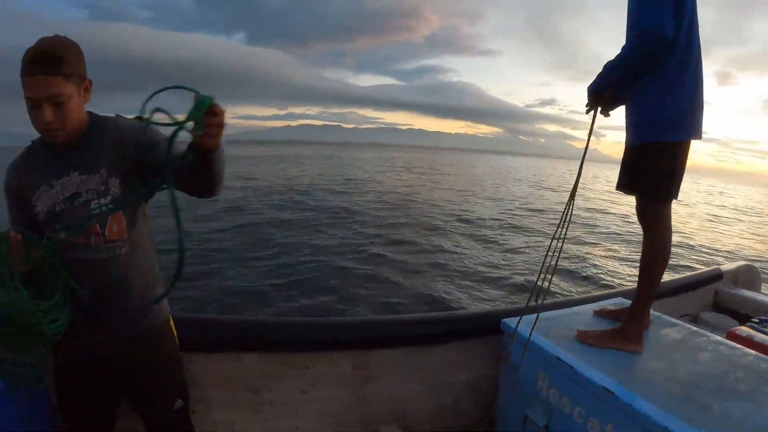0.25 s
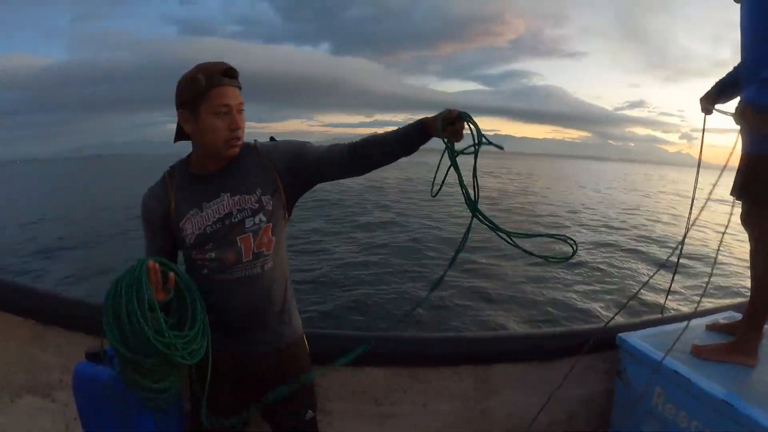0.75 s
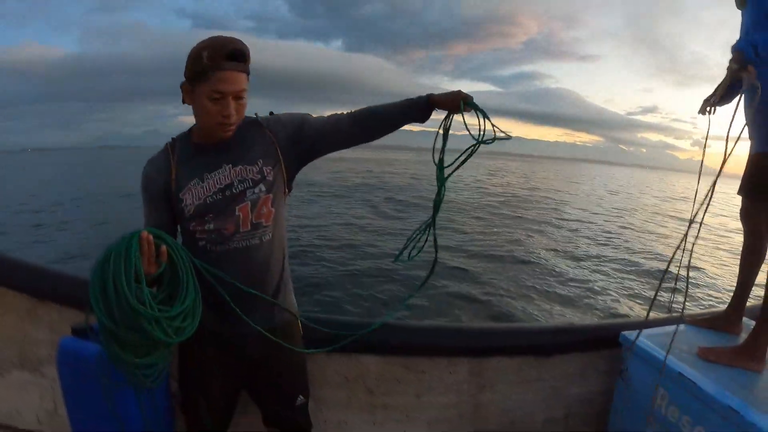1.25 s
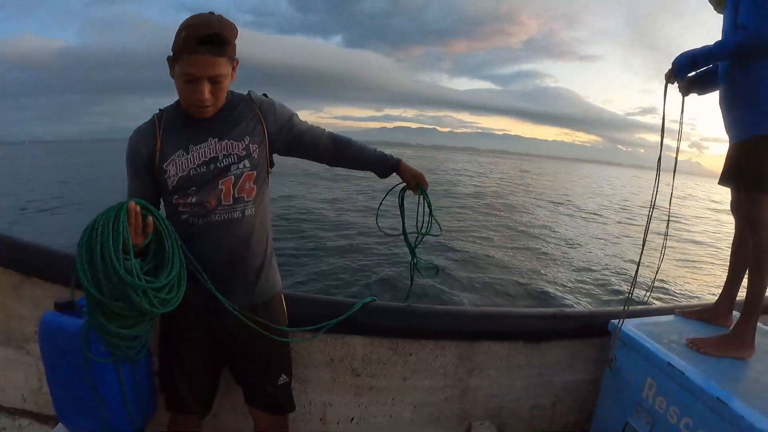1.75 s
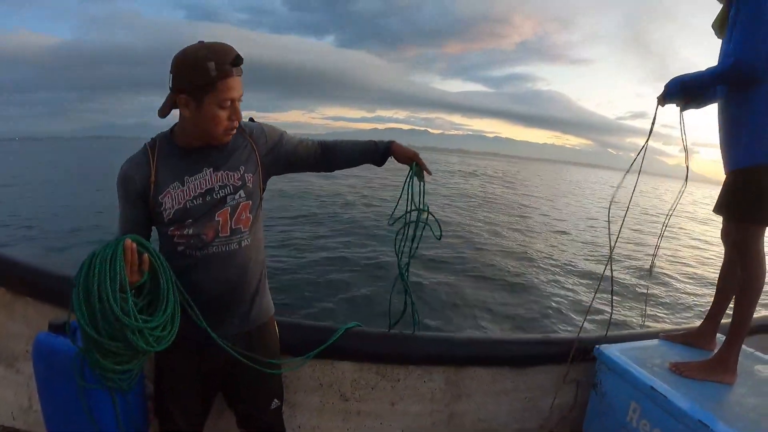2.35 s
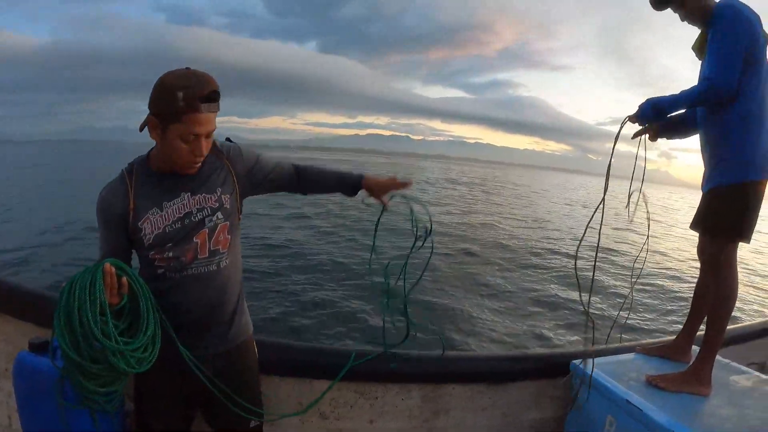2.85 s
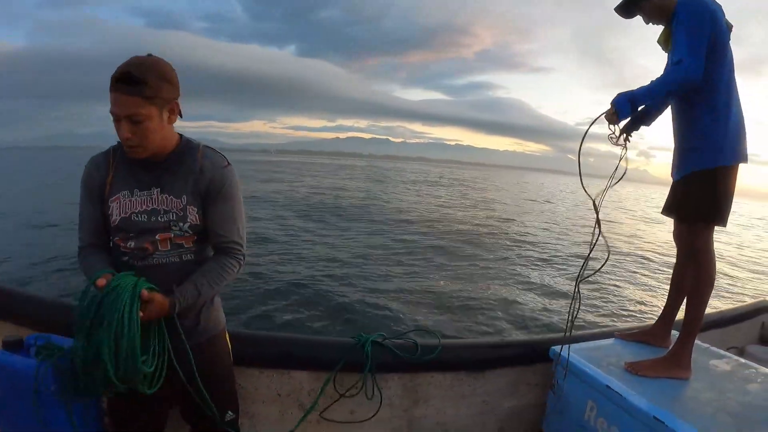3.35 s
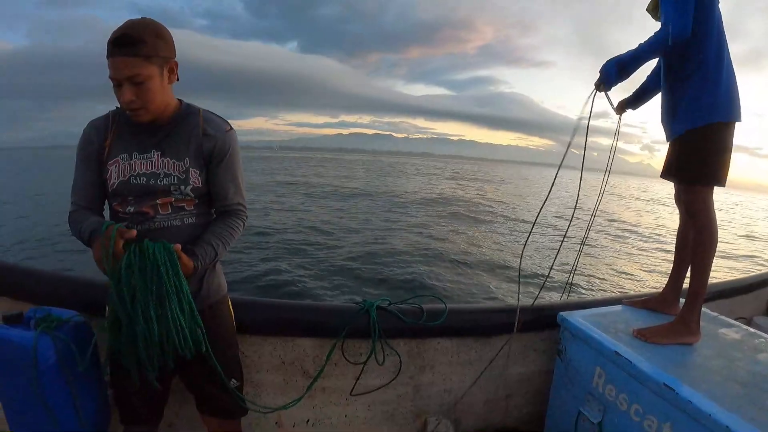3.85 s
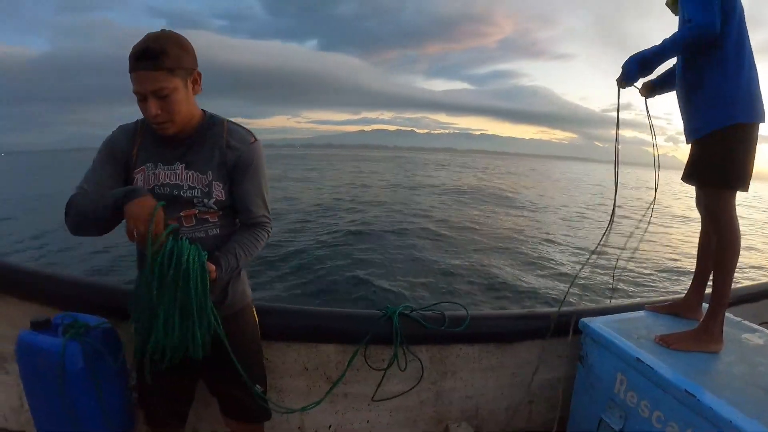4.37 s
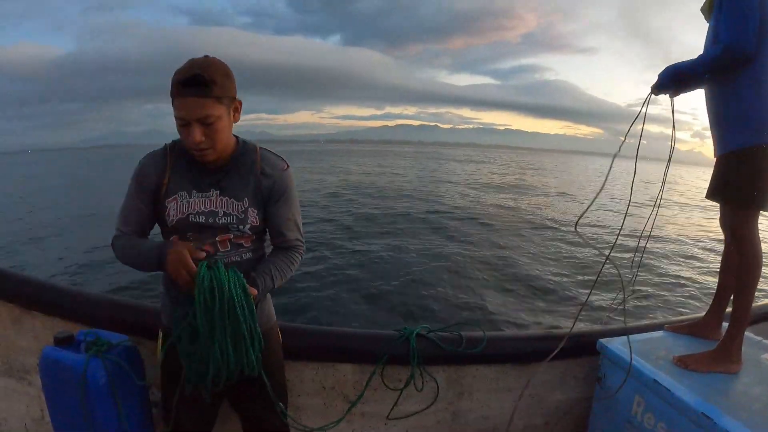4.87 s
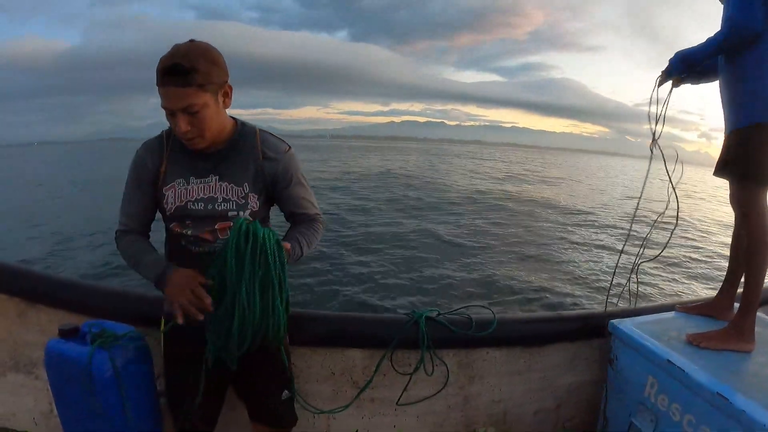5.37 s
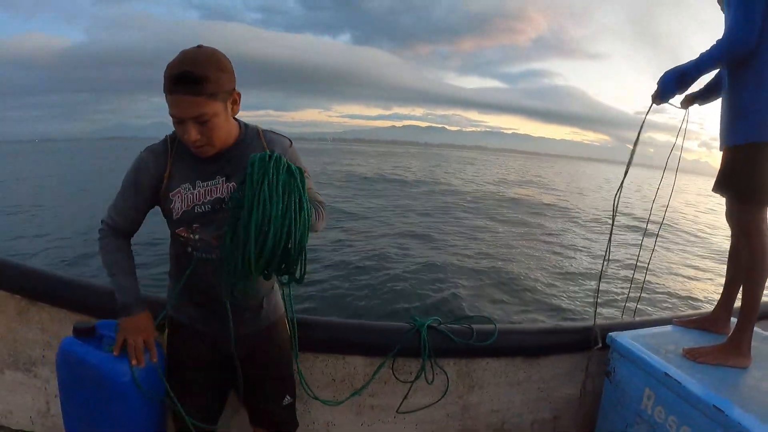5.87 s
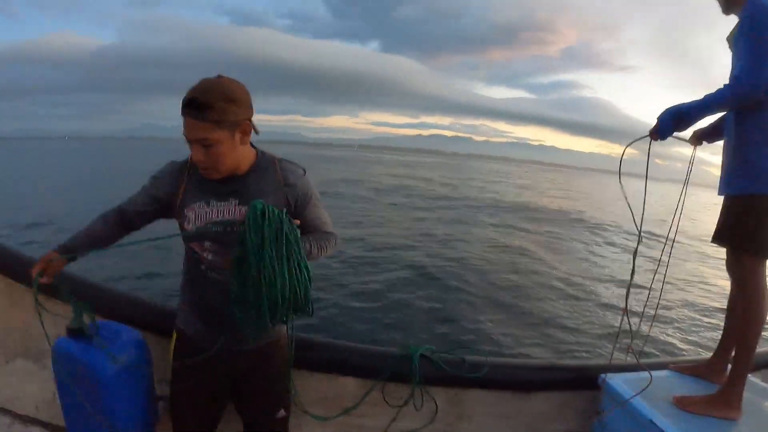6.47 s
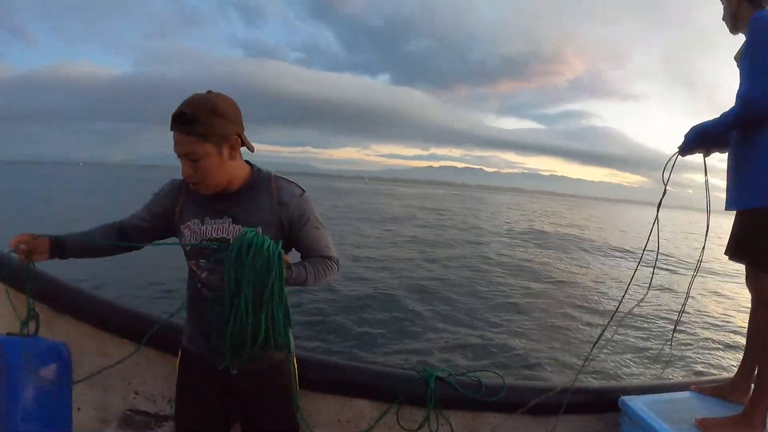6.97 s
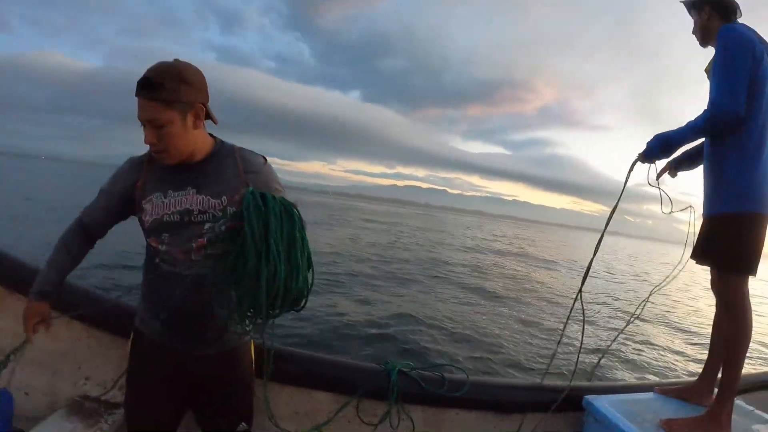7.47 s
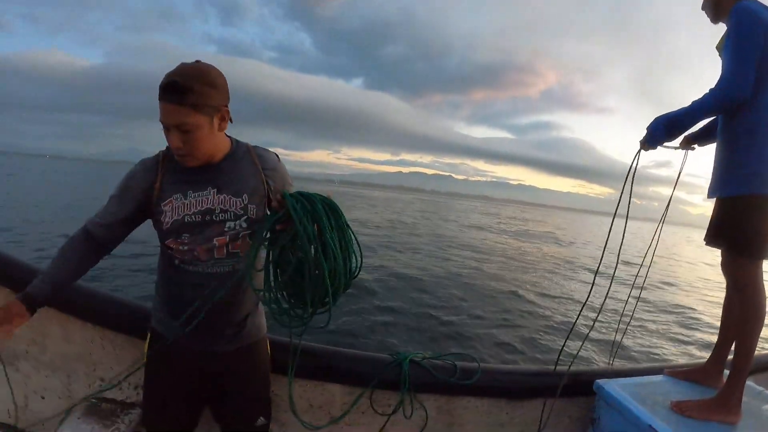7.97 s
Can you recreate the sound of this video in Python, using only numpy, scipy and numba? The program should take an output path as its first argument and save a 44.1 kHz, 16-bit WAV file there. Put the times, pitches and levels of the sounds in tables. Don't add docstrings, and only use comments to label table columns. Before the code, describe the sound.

Outdoors on a small open boat, close stereo microphone, dry, handling left of centre. A steady low sea rumble, soft wash and faint hiss run throughout. At 0-0.5 s there is a light flick and rub of line. Around 0.75-0.95 s a strong hollow cluster of plank knocks with gurgling pops. It quietens, with small drops near 1.0-1.2 s. From 2.0 to 3.0 s wet slaps, scrapes and low hull groans; at 3.2-3.8 s sharper flicks and rubs. From 4.2 to 5.5 s the busiest run: bright scrapes, bubbly squeaks, woody knocks. Lighter rubs around 5.6-6.4 s; at 6.55-6.8 s a wave slops up with a wind puff and quick flicks. At 7.1 s a knock, then at 7.2, 7.55, 7.85 and 8.1 s a plastic can thuds with deep boomy resonance, rattly walls and gritty scuffs.

```python
import sys
import numpy as np
from scipy import signal
from scipy.fft import rfft, irfft, next_fast_len
from scipy.io import wavfile
from scipy.ndimage import uniform_filter1d
from numba import njit

SR = 44100
rng = np.random.default_rng(int(sys.argv[2]) if len(sys.argv) > 2 else 0)


def to_wav(sig):
    pcm = np.clip(np.atleast_2d(sig), -1, 1) * 32767
    pcm = np.round(pcm).astype(np.int16)
    wavfile.write(sys.argv[1], SR, pcm.T)


def gain_from_decibels(decibels):
    exponent = np.asarray(decibels, float) / 20
    return 10 ** exponent


N = 362502

# t/s, scrape peak level/dB, hull ring above it/dB, spray above it/dB, decay time/s
SLAPS = [(0.759, -28.5, 6.5, -14, 0.31), (2.008, -28.5, 9.5, -12, 0.061), (2.054, -18.5, 1, -15.5, 0.33),
         (2.5664, -22.5, 11, -8.5, 0.072), (2.601, -24, 9.5, -9, 0.037), (2.676, -26, 6.5, -6.5, 0.15),
         (2.887, -23.5, 10.5, -16, 0.12), (3.211, -24, 4, -22, 0.071), (3.296, -15.5, -1, -19, 0.13),
         (3.712, -29, 10, -5.5, .067), (4.377, -15, 1.5, -22, 0.055), (4.434, -15.5, -1.5, -27, 0.046),
         (4.5042, -17, 0, -10, 0.15), (4.931, -29.5, 10, -10.5, 0.15), (5.222, -15, 3.5, -28, 0.092),
         (5.361, -25.5, 3, -28, 0.054), (5.399, -14.5, 5, -16.5, 0.14), (5.857, -32, 13.5, -17, 0.1),
         (6.014, -21, 3, -15.5, 0.089), (7.0714, -29, 12, -20, 0.09), (7.114, -28.5, 1, -19, 0.077)]
FLICKS = [(0.075, -21, -6, -18, 0.07), (0.995, -33, -21, -27, 0.066), (1.238, -33.5, -2, -34, 0.081),
          (3.124, -28, -12, -24, 0.13), (3.233, -19, -4, -20, 0.088), (3.74, -17.5, -6, -19, .069),
          (4.2228, -31, -3, -11, 0.082), (4.3279, -24, -20, -13.5, 0.095), (4.987, -14, -3, -12.5, 0.037),
          (5.485, -22, -42, -21, .056), (5.617, -28, 1, -8, 0.055), (5.9283, -25, -31, -18, 0.28),
          (6.561, -19.5, -9, -11.5, 0.078), (6.656, -18, -23, -26, .038), (6.68, -25, 2.5, -8, 0.061),
          (6.756, -19, -17, -32, 0.077), (6.79, -20, -11, -30, 0.08)]
SCUFFS = [
    (7.183, -17, -21, -14.5, 0.15),
    (7.3285, -25.5, -5, -21, 0.15),
    (7.436, -22, -41, -14.5, 0.079),
    (7.546, -22.5, 6, -11, 0.12),
    (7.5787, -19.5, -0.5, -10, 0.11),
    (7.84, -23.5, -14, -10, 0.15),
    (7.912, -24.5, -16, -16.5, 0.065),
    (8.066, -18, -27, -13.5, 0.077),
    (8.1614, -23, -2.5, -0.5, 0.073),
]
RUBS = [(0.294, -33.5, 9, -14, 0.079), (0.403, -35, -12, -9.5, 0.25), (1.809, -41, -50, -2.5, 0.14),
        (2.431, -34, 6, -13, 0.036), (2.5, -30.5, -12, -9, 0.28), (2.811, -30.5, -1, -19, 0.063),
        (3.002, -25.5, 7, -20, 0.28), (3.413, -34, 1, -5, 0.16), (1.45, -46, 17, -13, 0.049),
        (4.66, -32.5, -0.5, -10.5, 0.18), (4.763, -32, -5, -12, 0.084), (4.8296, -34.5, -3, -10.5, 0.091),
        (4.892, -31, 7, -26, 0.04), (5.714, -35, -1, -8, 0.15), (6.1992, -33.5, 9, -17, 0.096),
        (6.303, -23, -6, -6, 0.036), (6.382, -28.5, -2, -1.5, 0.17), (6.905, -47, -10, 5, 0.056),
        (3.905, -32, -4, -4, 0.034), (7.72, -34.5, -3, -24, 0.056), (8.011, -38, -4.5, -27.5, 0.07)]
SURGES = [(0.202, -29.5, 6, -9, 0.2), (0.818, -21, 6.5, -27, 0.37), (2.22, -13, 1, -24, 0.056),
          (5.024, -18, 4.5, -12, 0.15), (5.118, -13.5, 2.5, -14, 0.093), (0.1, -30.5, -15, -18, 0.22),
          (5.285, -23, 3.5, -13, .06), (2.18, -16, 1, -13, 0.11), (5.195, -30, 0, -25, 0.052),
          (7.49, -29.5, -3, -19, 0.056), (3.8, -22.5, 2.5, -7, 0.16), (4.158, -18, -9, -11.5, 0.086),
          (1.32, -48, 3, -4, .25)]
# t/s, length/s, scrape level/dB, hull ring above scrape/dB
HAULS = [(0, 0.32, -45.5, 4), (0.749, 0.12, -37, 14.5), (2.063, 0.21, -29.5, 11.5),
         (2.485, 0.14, -38, 14.5), (2.69, 0.056, -38.5, 8), (2.879, 0.067, -31, 10.5),
         (2.977, 0.087, -35, 7), (3.239, 0.08, -33.5, 0), (3.706, 0.025, -29, 6), (3.782, 0.05, -33.5, 3),
         (4.115, 0.036, -40.5, 3), (4.373, 0.021, -24, 6), (4.488, 0.025, -32, 15), (4.907, 0.26, -38, 5),
         (5.247, 0.32, -41, 4.5), (5.376, 0.17, -35.5, -18), (5.838, 0.15, -35.5, 3.5),
         (5.955, 0.1, -40.5, 15), (6.282, 0.35, -39, 3), (7.157, 0.03, -37.5, 19.5),
         (7.561, 0.035, -35.5, 4), (7.833, 0.029, -42.5, 10.5), (7.6, 0.068, -41.5, -6),
         (8.067, 0.087, -46.5, 4.5), (8.158, 0.046, -43, 10), (2.28, 0.09, -41, 5)]
# t/s, level/dB
TRICKLE = [(0, -45.5), (.34, -63.5), (.95, -44.5), (1.08, -62.5), (1.9, -62), (2.0, -45.5), (2.46, -66),
           (3.15, -45), (3.5, -54), (3.95, -51), (4.65, -49.5), (4.88, -55.5), (5.6, -55), (5.82, -56.5),
           (6.2, -49), (7.0, -53.5), (7.4, -48.5), (7.8, -55)]
# f/Hz, bandwidth/Hz, level/dB
HULL_MODES = [(377, 25.4, 3.5), (420, 24.5, -1.5), (470.7, 16.5, 0), (542, 55, 3), (607, 35, -2.5),
              (661, 17.3, -2.5), (732, 35, -1.5)]
# f/Hz, level per Hz/dB
GURGLE = [(650, -21), (820, 5.5), (1020, 8.5), (1300, 3), (1600, -0.5), (2000, -63)]
# f/Hz, level per Hz/dB
SCRAPE = [(1300, -24), (1750, 0.5), (2100, -1), (2800, -3), (3600, -4.5), (4500, -30), (5500, -84)]
# f/Hz, level per Hz/dB
SPRAY = [(3300, -5), (4400, 1.5), (5500, -3.5), (7500, -9.5), (8500, -16.5), (10000, -21.5), (13000, -25.5),
         (15500, -63)]
# t/s, peak level/dB, f/Hz
KNOCKS = [(0.761, -17.5, 546), (0.794, -13, 437), (0.815, -7, 401.5), (0.845, -13.5, 454),
          (0.861, -13.5, 366), (0.888, -19, 476), (0.915, -21, 377), (0.95, -28, 334), (2.01, -22, 612),
          (2.054, -16, 565), (2.078, -11, 464), (2.107, -12, 483), (2.139, -14, 482), (2.164, -16, 463),
          (2.223, -17, 463), (2.249, -12, 575), (2.274, -14, 468), (2.513, -25, 363), (2.536, -15, 405),
          (2.572, -18, 550), (2.602, -14.5, 378), (2.678, -24, 454), (2.698, -20, 389), (2.893, -14.5, 394),
          (2.924, -15.5, 393), (2.978, -26, 478), (3.035, -17, 475), (3.299, -19.5, 597),
          (3.713, -27.5, 450), (3.804, -30, 482), (4.38, -21, 388), (4.435, -17.5, 654), (4.505, -26, 690),
          (4.519, -14, 657), (4.929, -24, 660), (4.965, -17.5, 392), (5.04, -16.5, 394), (5.064, -18, 638),
          (5.129, -19.5, 651), (5.143, -15, 387), (5.222, -20.5, 480), (5.294, -21.5, 607),
          (5.409, -14.5, 447.5), (5.429, -12, 457), (5.858, -17, 466), (5.97, -22, 455),
          (5.991, -20.5, 500), (6.012, -16, 413), (7.075, -11, 395), (7.133, -18.5, 410)]
# t/s, peak level/dB, f/Hz
POPS = [(0.764, -29, 1240), (0.849, -15, 883), (0.894, -18, 1145), (0.946, -23.5, 950), (2.054, -14, 2120),
        (2.127, -10.5, 1184), (2.22, -11.5, 1075), (2.68, -22, 1190), (3.296, -11, 996), (3.327, -14, 1180),
        (4.377, -13.5, 1330), (4.436, -10, 1007), (4.505, -26, 1086), (5.027, -19, 1085),
        (5.084, -15, 1097), (5.222, -13, 1274), (5.399, -9, 1390), (6.562, -25, 974), (6.658, -24, 918),
        (6.757, -17.5, 1213), (6.791, -23, 1370), (7.075, -18.5, 1160), (7.122, -20.5, 954),
        (7.549, -16, 1247), (7.577, -19, 904), (7.599, -20.5, 880), (8.068, -22, 1800), (8.162, -19.5, 956),
        (8.068, -21, 2254), (8.162, -20, 2820), (8.163, -21, 3540), (7.915, -24, 1900), (8.012, -31, 1350),
        (1.82, -37, 3100)]
# t/s, peak level/dB, centre f/Hz
TICKS = [(.214, -35.5, 3000), (.278, -41.5, 4500), (.425, -43.5, 5000), (.447, -38, 4000),
         (1.513, -58, 7000), (1.948, -47, 2200), (2.34, -45, 4000), (2.39, -42, 3000), (2.535, -29.5, 4000),
         (3.184, -38, 2800), (3.214, -29, 3600), (3.267, -30, 4200), (3.284, -32.5, 2200),
         (3.417, -34, 3560), (3.786, -38, 5000), (3.838, -30.5, 4500), (3.875, -35, 2300),
         (4.505, -19, 2920), (5.836, -36, 1500), (5.86, -31, 2800), (5.953, -30.5, 3200),
         (5.995, -34, 2500), (6.092, -39, 3500), (6.268, -41.5, 3200), (7.184, -17.5, 3130),
         (7.588, -21, 3370), (7.84, -29, 2500), (8.068, -17.5, 2560), (8.154, -36, 2190), (2.21, -26, 3200),
         (3.296, -17, 1390), (4.378, -18, 1500), (7.724, -35.5, 1500), (7.859, -30, 3200),
         (5.674, -34, 3500)]
# t/s, peak level/dB, f/Hz
BOOMS = [(0.598, -28.5, 285), (0.787, -25, 233), (1.849, -30.5, 164), (2.132, -22, 164), (2.209, -29, 252),
         (2.251, -20, 251), (2.339, -39, 237), (2.574, -23.5, 147), (2.878, -27, 220), (3.35, -29, 150),
         (3.441, -35, 127), (3.847, -26, 140), (4.022, -35, 133), (4.377, -28, 241), (4.427, -25.5, 247),
         (5.132, -24.5, 232), (5.304, -34.5, 318), (5.404, -19, 250), (5.928, -35, 213), (6.017, -26, 243),
         (6.392, -21.5, 148), (6.545, -24, 205), (6.669, -24, 262), (6.876, -32, 180)]
# t/s, peak level/dB, share of the lower drum modes (0-1), wall ring/dB
THUDS = [(7.187, -8, 0.34, -6.5), (7.224, -15, 0.3, -2.5), (7.55, -10, 0.06, -2.5), (7.591, -17, 0.74, 7),
         (7.621, -14.5, 1, -3), (7.839, -13, 1, -7.5), (7.873, -6, 0.46, -11), (7.919, -17, 0.5, -13),
         (8.072, -18, 0.97, -4.5), (8.171, -13, 0.71, -12), (8.2, -18, 0.87, -22.5)]
# f/Hz, level/dB, t60/s
CAN_LOW = [(74.6, -1, 0.89), (77.4, -6, 0.31)]
# f/Hz, level/dB, t60/s
CAN_HIGH = [(99.5, 5, 0.5), (113, -15, 0.069)]
# f/Hz, level/dB, t60/s
CAN_WALL = [(140, -5.5, 0.38), (176.7, -6.5, 0.23), (191.5, -5, 0.23), (262, 1.5, 0.051), (310, 0.5, 0.14),
            (398, -9, 0.18), (614, -6, 0.16), (917, 1, 0.62)]
# t/s, peak level/dB, f/Hz, t60/s
DROPS = [(.3, -39, 1260, .04), (0.602, -22.5, 420, 0.02), (1.0, -33.5, 1470, 0.085),
         (1.138, -37.5, 3100, 0.026), (1.201, -35.5, 1078, 0.12), (2.811, -30, 1155, 0.082),
         (3.62, -32, 765, 0.087), (3.68, -42, 1670, .03), (3.935, -37, 1400, 0.044),
         (4.05, -38, 2400, 0.046), (6.82, -46, 1214, 0.17)]
# t/s, level/dB
SWELL = [
    (0.0, -43),
    (1.65, -45),
    (3.07, -41),
    (4.12, -45),
    (6.2, -42),
    (6.59, -34.5),
    (6.8, -39.5),
    (7.7, -43.5),
    (7.87, -48),
    (8.22, -42),
]
# f/Hz, level per Hz/dB
WASH = [(59, -16), (100, -6), (215, -3.5), (247, -4), (317, -10), (400, -20.5), (520, -41), (880, -120)]
# f/Hz, level per Hz/dB
RUMBLE = [(11, -48), (18, -15), (36, -6.5), (49, -1.5), (113, -10), (130, -26), (170, -35), (290, -120)]
# f/Hz, level per Hz/dB
WAVELETS = [(250, -14), (330, 5), (430, -3), (650, -4.5), (1100, -24.5), (2500, -39.5), (7000, -36),
            (15500, -56.5)]
# t/s, level/dB, left minus right/dB
BREEZE = [(2.4, -69, 0.5), (2.74, -46, 12), (3.13, -36.5, -26), (3.42, -40, -11), (3.5, -37.5, -19),
          (4.39, -37, -4), (4.49, -32, -7), (4.61, -43, -12), (4.98, -43.5, 26), (5.11, -38.5, -3),
          (5.46, -42.5, 10), (5.51, -60, 22), (6.44, -46, -8), (6.58, -26.5, -7), (6.73, -43.5, 17),
          (7.1, -38.5, -5)]
# f/Hz, level per Hz/dB
BUFFET = [(11, -33), (18, 12.5), (38, -8), (54, 4), (111, -7), (200, -14.5), (260, -18), (440, -120)]
# t/s, left minus right/dB
SIDEWAYS = [
    (0.0, 14.5),
    (0.73, 3),
    (4.23, 4),
    (5.04, 2.5),
    (6.11, 3),
    (6.34, 6.5),
    (8.22, 9),
]
# f/Hz, phase/rad
PORT_LEAD = [(80, 0), (200, 0.5), (430, -1.27), (600, 0.95), (1500, 0), (3600, -1.53), (7500, -0.34),
             (13000, -4.5)]
# f/Hz, left minus right/dB
PORT_BALANCE = [(80, 4), (300, 3), (600, -0.5), (1100, 2.5), (2800, 4.5), (4500, 0), (7000, -2.5),
                (12000, -3.5)]
# f/Hz, level/dB
NEAR_SCATTER = [(400, -18), (1000, -12), (2000, -15), (3600, -11), (5500, -5), (8500, -2.5), (12000, -1.5)]
# f/Hz, level/dB
SEA_SCATTER = [(60, -16), (300, -19.5), (1100, 1), (3000, 10.5), (5000, 0.5), (9000, -1.5)]


def line():
    snag_db = 1.7 * walk(40)
    drag = gain_from_decibels(-10.0 + snag_db) * hauls()
    drives = np.sqrt(drag + contacts())
    scrape, hull, gurgle, spray = drives
    contact = grit(spread_db=1.84, flutter_db=0.9)
    contact = contact / np.std(contact)
    planks = hull_planks(hull * contact)
    wet = bubbles(drives[:3], low_hz=370, high_hz=4370, cycles=10.6, spread_db=3.5, rise=0.041, count=3000)
    noises = np.array([patchy(colour(contact, table), spread_db=4.0) for table in (GURGLE, SCRAPE, SPRAY)])
    levels = np.array([gain_from_decibels(-2.5) * gurgle, gain_from_decibels(-3.5) * scrape, spray])
    direct = gain_from_decibels(-1.5) * planks + (levels * noises).sum(axis=0) + gain_from_decibels(-0.5) * wet
    scattered = (levels * noises[:, ::-1]).sum(axis=0)
    return direct, scattered


def contacts():
    step = 8
    power = np.zeros((4, N // step + 1))
    t = np.arange(SR // 4 // step) * step / SR
    lags = np.c_[[0.85, 1.36, 1.15, 0.73]]
    crack = np.c_[[0.63, 0.63, 0.66, 1.88]] * np.exp(-t / 0.0041)
    # table, rise/s, gurgle above scrape/dB, share of crack
    kinds = [(SLAPS, 0.0014, 1, 1), (FLICKS, 0.0014, 0, 1), (SCUFFS, 0.0014, 0, 1),
             (RUBS, 0.0022, -1, 0), (SURGES, 0.0063, 0, 0)]
    for table, rise_s, gurgle_db, crack_share in kinds:
        onset = 1 - np.exp(-t / rise_s)
        for s, db, hull_db, spray_db, t60 in table:
            decay = np.clip(t60, 0.02, 0.25) * lags
            shape = onset * (gain_from_decibels(-60 * (t / decay) ** 1.745) + crack_share * crack)
            layers_db = np.c_[[0, hull_db, gurgle_db + 0.32 * hull_db, spray_db]]
            pulse = (gain_from_decibels(db - 10 + layers_db) * shape) ** 2
            i = int(s * SR / step)
            power[:, i:i + len(t)] += pulse[:, :power.shape[1] - i]
    return np.repeat(power, step, axis=1)[:, :N]


def hauls():
    step = 32
    t = np.arange(N // step + 1) * step / SR

    def layers_db(hull_db):
        return np.c_[[0, hull_db, 0.5 + 0.41 * hull_db, -9.5]]

    trickle_db = np.interp(t, *np.transpose(TRICKLE)) + np.resize(walk(12)[::step], len(t))
    extra_spray_db = np.c_[[0, 0, 0, 4.5]]
    power = gain_from_decibels(trickle_db + layers_db(-3) + extra_spray_db) ** 2
    for s, length, db, hull_db in HAULS:
        rise = np.clip((t - s) / 0.031, 0, 1)
        fade_db = 192 * np.maximum(t - s - length, 0) * np.c_[[1, 0.9, 1, 1]]
        power = power + (rise * gain_from_decibels(db - fade_db + layers_db(hull_db))) ** 2
    return np.repeat(power, step, axis=1)[:, :N]


def grit(spread_db, flutter_db):
    sizes = gain_from_decibels(spread_db * rng.exponential(size=N) + flutter_db * (walk(40) + walk(150)))
    return sizes * rng.standard_normal(N)


def hull_planks(force):
    modes = [(hz, db, np.log(1000) / np.pi / width) for hz, width, db in HULL_MODES]
    tap = np.linalg.norm(ring(np.eye(1, SR // 4)[0], modes))
    return highpass(ring(force, modes), 337, order=3) / tap


def bubbles(drives, low_hz, high_hz, cycles, spread_db, rise, count):
    when, pitch, life, luck = rng.random((count, 4)).T
    starts = (when * N).astype(np.int64)
    hz = low_hz * (high_hz / low_hz) ** pitch
    samples = cycles * (0.5 + life) * SR / hz
    scrape, hull, gurgle = drives[:, starts]
    drive = np.where(hz < 640, 0.64 * hull, np.where(hz < 1700, gurgle, 0.25 * scrape))
    size = drive * gain_from_decibels(-spread_db * np.log(1 - 0.96 * luck))
    fade, glide = gain_from_decibels(-50 / samples), (1 + rise) ** (1 / samples)
    return grains(starts, 2 * np.pi * hz / SR, fade, glide, size, N)


@njit
def grains(starts, turn, fade, glide, size, length):
    out = np.zeros(length)
    for k in range(len(starts)):
        a, w, phase, i = size[k], turn[k], 0., starts[k]
        while a > size[k] / 300 and i < length:
            phase += w
            out[i] += a * np.sin(phase)
            a, w, i = a * fade[k], w * glide[k], i + 1
    return out


def plank_knocks():
    return rings(KNOCKS, 0.086, trim_db=1.0, rise_s=0.0056, glide=-0.0088, wobble=0.014)


def air_pops():
    return rings(POPS, 0.055, trim_db=-4.5, rise_s=0.0028, glide=0.02, wobble=0.04)


def ticks(rise_s, t60, width):
    out, t = np.zeros(N + SR // 20), np.arange(SR // 20) / SR
    envelope = t / (t + rise_s) * gain_from_decibels(-60 * t / t60)
    for s, db, hz in TICKS:
        band = signal.butter(2, [hz / width, hz * width], "bandpass", fs=SR, output="sos")
        burst = envelope * signal.sosfilt(band, rng.standard_normal(len(t)))
        i = int(s * SR)
        out[i:i + len(t)] += gain_from_decibels(db) * burst / np.abs(burst).max()
    return out[:N]


def hull_booms():
    return rings(BOOMS, 0.14, trim_db=1.5, rise_s=0.011, glide=-0.021, wobble=0.0079)


def can(push_s, knock_s):
    blows = np.zeros((3, N))
    for s, db, low, wall_db in THUDS:
        blows[:, int(s * SR)] = gain_from_decibels(db) * np.array([low, 1 - low, gain_from_decibels(wall_db)])
    push, knock = np.hanning(int(push_s * SR)), np.hanning(int(knock_s * SR))
    drum = ring(blows[0], CAN_LOW) + ring(blows[1], CAN_HIGH)
    drum = signal.oaconvolve(drum, push / push.sum())[:N]
    walls = signal.oaconvolve(ring(blows[2], CAN_WALL), knock / knock.sum())[:N]
    return highpass(drum, 65, order=3) + highpass(walls, 178, order=2)


def falling_drops():
    return rings(DROPS, trim_db=0.5, rise_s=0.0014, glide=0.052, wobble=0.056)


def sea():
    rumble = gain_from_decibels(-44.5 + 0.25 * walk(22)) * colour(rng.standard_normal(N), RUMBLE)
    heave_db = 0.6 * walk(15)
    wash = gain_from_decibels(curves(SWELL)[0] + 2.0 + heave_db) * colour(rng.standard_normal(N), WASH)
    hiss = gain_from_decibels(-49 + 0.5 * walk(4.3)) * colour(grit(spread_db=1.5, flutter_db=1.43), WAVELETS)
    return rumble + wash + hiss


def breeze():
    gust_db, pan_db = curves(BREEZE)
    eddies = gain_from_decibels(1.1 * walk(10)) * colour(rng.standard_normal(N), BUFFET)
    unlike = np.array([eddies, eddies[::-1]])
    return gain_from_decibels(gust_db + 1.5 + np.array([pan_db, -pan_db]) / 2) * unlike


def ports(direct, other, scatter):
    size = next_fast_len(N)
    hz = np.fft.rfftfreq(size, 1 / SR)
    sign = np.array([[1], [-1]])
    shift = gain_from_decibels(sign * read(PORT_BALANCE, hz) / 2) * np.exp(0.5j * sign * read(PORT_LEAD, hz))
    diffuse = sign * gain_from_decibels(read(scatter, hz)) * rfft(other, size)
    return irfft(shift * (rfft(direct, size) + diffuse), size)[:, :N]


def ring(x, modes):
    out = 0
    for hz, db, t60 in modes:
        pole = np.exp((2j * np.pi * hz - np.log(1000) / t60) / SR)
        out = out + gain_from_decibels(db) * signal.lfilter([0, pole.imag], [1, -2 * pole.real, abs(pole) ** 2], x)
    return out


def rings(table, *shared_t60, trim_db, rise_s, glide, wobble):
    out, t = np.zeros(N + SR // 5), np.arange(SR // 5) / SR
    for row in table:
        s, db, hz, t60 = (*row, *shared_t60)
        drift = np.cumsum(rng.standard_normal(len(t))) * wobble
        tone = np.sin(2 * np.pi * hz * t * (1 + glide * t / t60) + drift)
        envelope = gain_from_decibels(db + trim_db - 60 * t / t60) * (1 - np.exp(-t / rise_s))
        i = int(s * SR)
        out[i:i + len(t)] += envelope * tone
    return out[:N]


def patchy(x, spread_db):
    spectrum = signal.stft(x, nperseg=512)[2]
    field = uniform_filter1d(rng.standard_normal(spectrum.shape), size=2, axis=0)
    field = uniform_filter1d(field, size=3, axis=1)
    patched = spectrum * gain_from_decibels(spread_db * field / field.std())
    patched = patched * np.linalg.norm(spectrum, axis=0) / np.linalg.norm(patched, axis=0)
    return signal.istft(patched, nperseg=512)[1][:N]


def colour(x, table):
    size = next_fast_len(N)
    gain = gain_from_decibels(read(table, np.fft.rfftfreq(size, 1 / SR)))
    y = irfft(rfft(x, size) * gain, size)[:N]
    return y / np.std(y)


def read(table, hz):
    f, v = np.transpose(table)
    return np.interp(np.log(hz + 1), np.log(f + 1), v)


def curves(table):
    s, *columns = np.transpose(table)
    return [np.interp(np.arange(N) / SR, s, c) for c in columns]


def walk(rate):
    k = int(SR / rate)
    held = np.repeat(rng.standard_normal(N // k + 1), k)
    return 2.45 * uniform_filter1d(uniform_filter1d(held, k), k)[:N]


def highpass(x, hz, order):
    return signal.sosfilt(signal.butter(order, hz, "highpass", fs=SR, output="sos"), x)


def scene():
    near, scattered = line()
    planks = plank_knocks() + air_pops() + ticks(rise_s=0.00063, t60=0.032, width=1.22)
    direct = near + falling_drops() + planks
    reflected = scattered + 0.51 * np.roll(planks, SR // 150)
    pan_db = curves(SIDEWAYS)[0] - 3
    swing = gain_from_decibels(0.65 * np.array([pan_db, -pan_db]) / 2)
    handling = swing * ports(direct, reflected, NEAR_SCATTER)
    water = sea()
    low = water + hull_booms() + can(push_s=0.01, knock_s=0.0027)
    below = ports(low, np.roll(water, SR // 3), SEA_SCATTER)
    return handling + below + breeze()


def top_cut(x):
    return signal.sosfilt(signal.butter(12, 15700, fs=SR, output="sos"), x)


def record(dry):
    dry = highpass(dry, 26.0, order=2)
    mix = np.tanh(1.214 * dry)
    return top_cut(mix)


dry = scene()
out = record(dry)
to_wav(out)
```